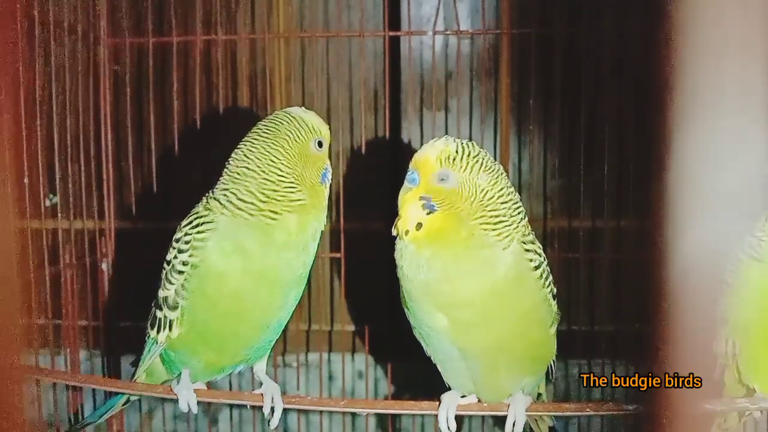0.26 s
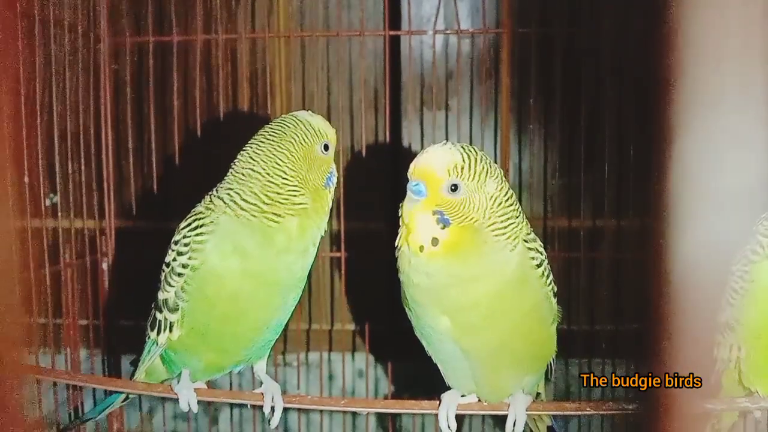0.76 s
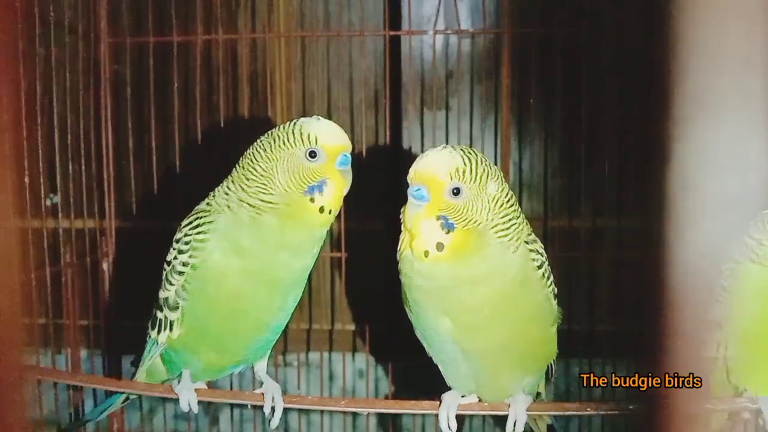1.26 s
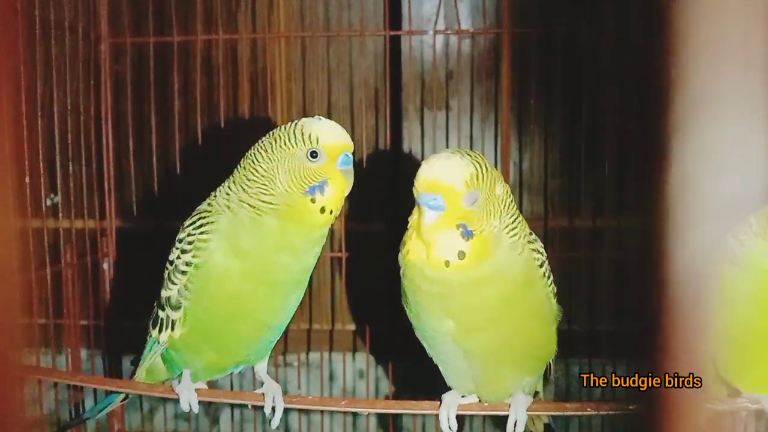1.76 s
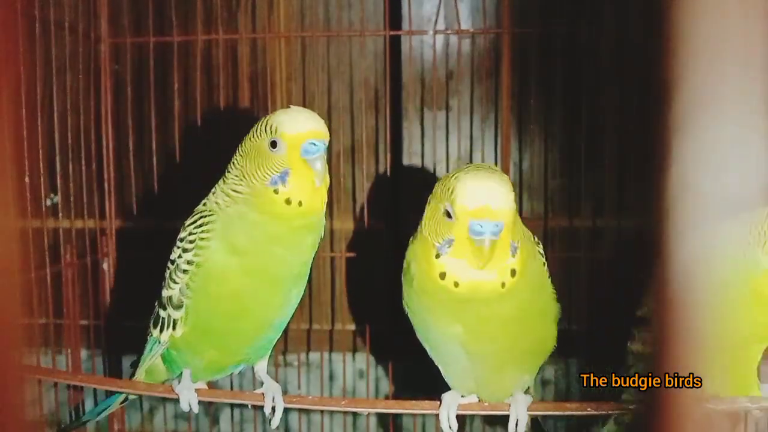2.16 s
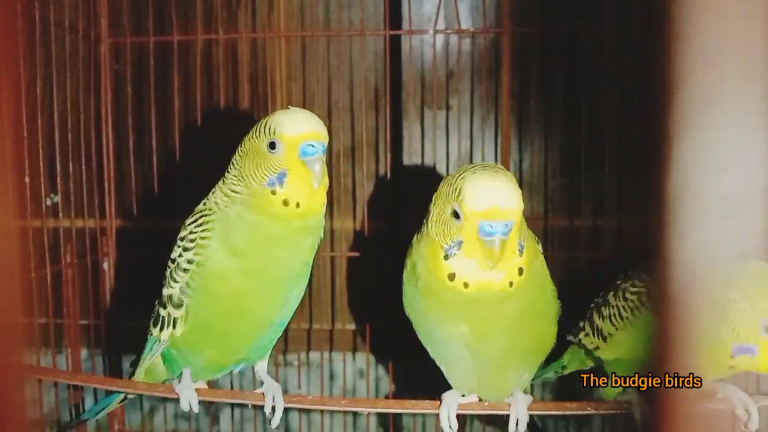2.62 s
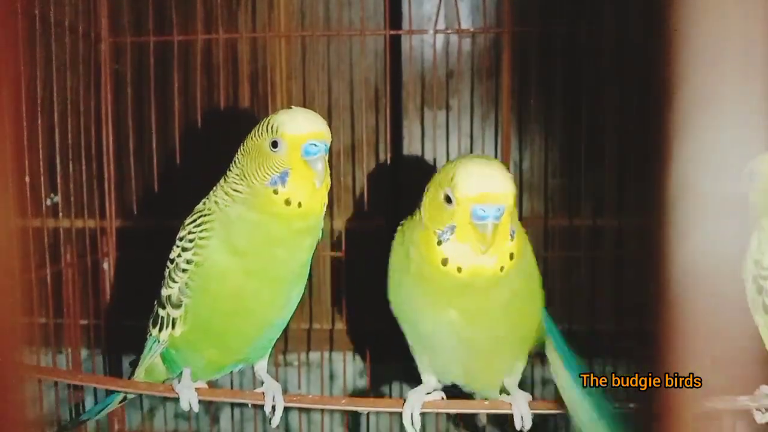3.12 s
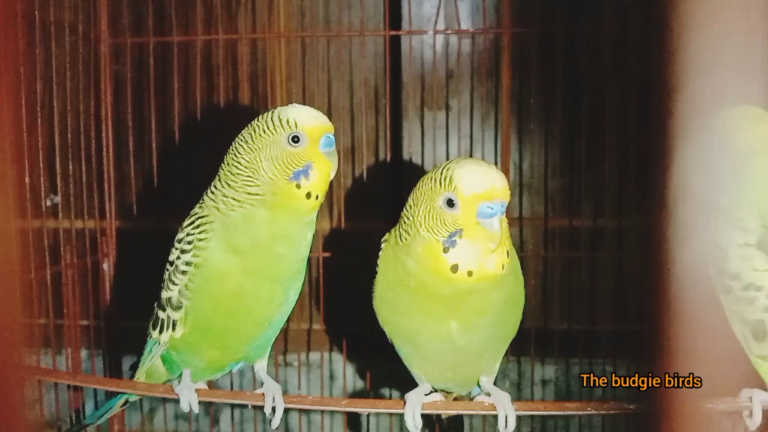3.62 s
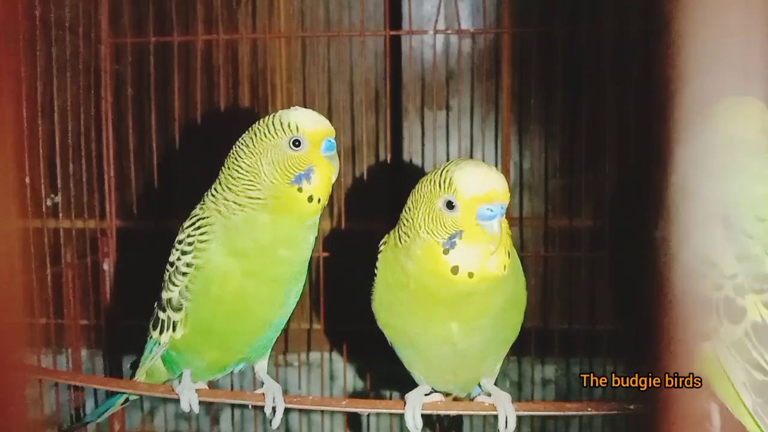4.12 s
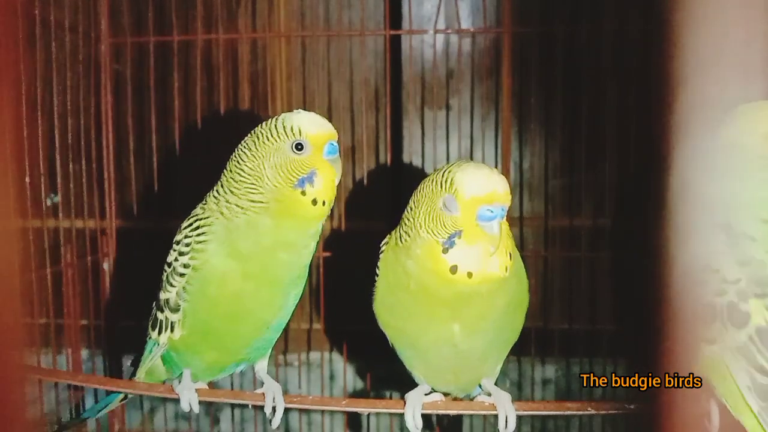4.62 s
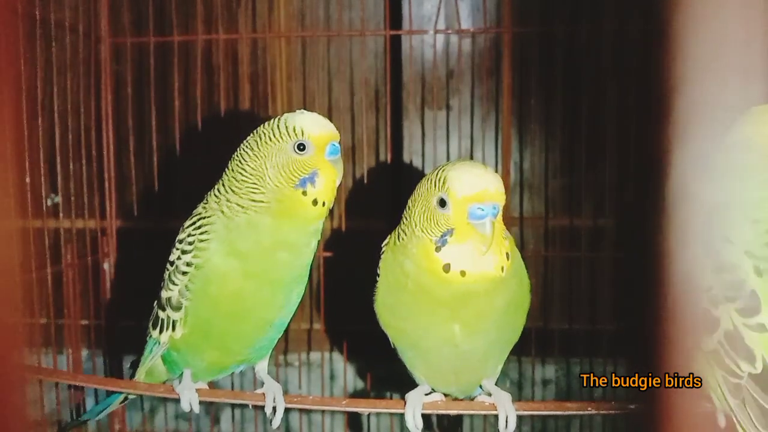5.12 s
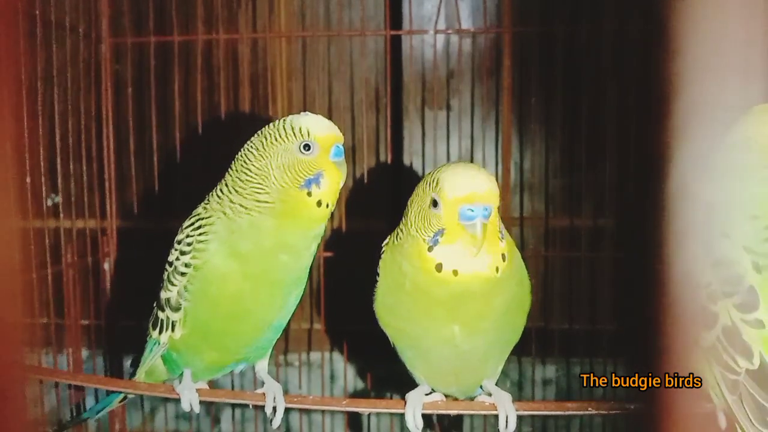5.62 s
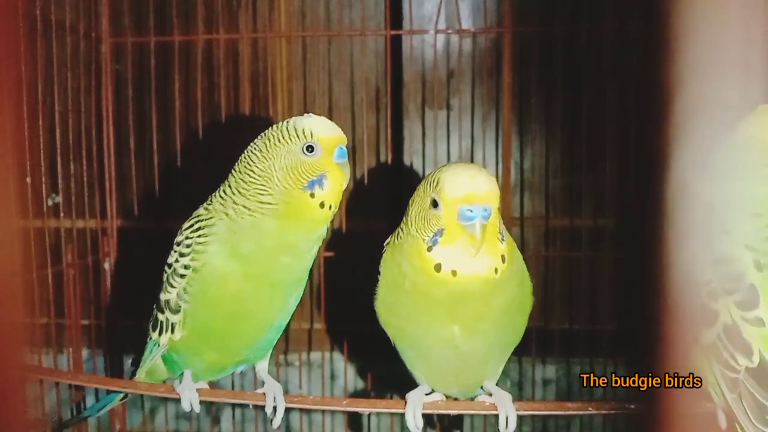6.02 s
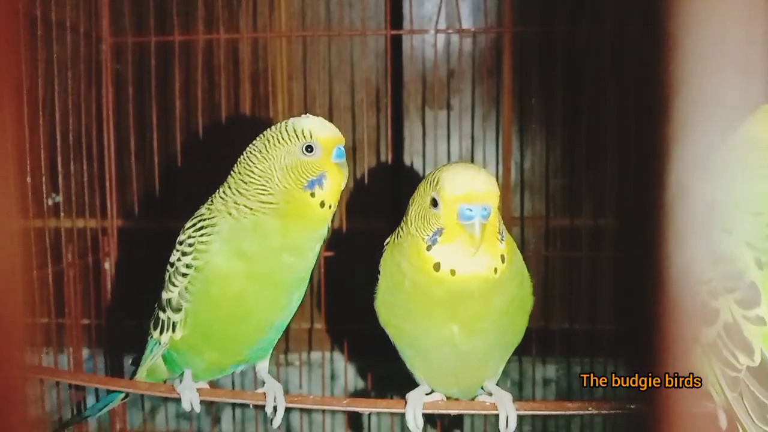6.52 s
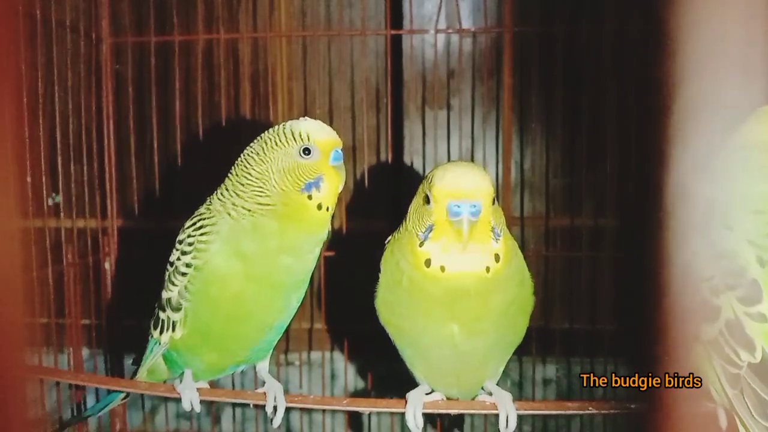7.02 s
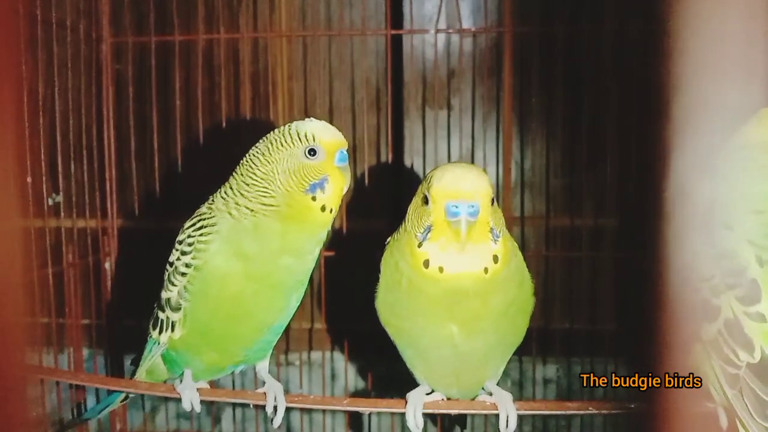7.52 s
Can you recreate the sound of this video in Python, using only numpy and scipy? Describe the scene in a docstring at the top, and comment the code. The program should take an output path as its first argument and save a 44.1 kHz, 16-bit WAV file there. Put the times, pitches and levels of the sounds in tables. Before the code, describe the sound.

Small parakeets warble at close range, with short room echoes. Sparse soft murmurs and grating rasps lead to a dense, piercing run of tiny arched chirps around two seconds in, more chirps near three, and two fluttering squawks before five. The rest is much softer: low gliding mutters, little clucks and dry rasps, over near-silent air with occasional beak clicks and dull perch bumps.

```python
"""Budgerigars warble in a cage close to the microphone: quick arched chirps from taut, buzzing membranes.
Gliding notes, soft low mutters and some louder, higher ones, slide onto a pitch; squawks swing up and down,
and rasps and clucks are slaps of the syrinx. Thin sine glides are faint calls and one clearer rising note.
Snaps of bright noise are beaks and claws, low noise bumps are birds shifting on the perch.
A small quiet room adds echoes, faint air and swells of low rumble; a noise suppressor thins the weak treble."""
import sys
import numpy as np
from scipy import signal
from scipy.fft import rfft, irfft
from scipy.io import wavfile
from scipy.ndimage import uniform_filter1d, minimum_filter1d

SR = 44100
rng = np.random.default_rng(int(sys.argv[2]) if len(sys.argv) > 2 else 0)


def generate_wav(sig):
    """Save sig (samples, or channels by samples) to the path in sys.argv[1] as 16-bit PCM at SR."""
    pcm = np.round(np.clip(np.atleast_2d(sig).T, -1, 1) * 32767).astype(np.int16)
    wavfile.write(sys.argv[1], SR, pcm)


N = 342657
EDGE_HZ = 15700  # upper band limit

# Levels of the calls and ticks are those ahead of the mix.
# Arched chirps. Each row: start in seconds, end in seconds, top pitch in Hz, place of the crest (0-1),
# level in dB, swell over its length in dB, beak opening in dB.
CHIRPS = [(1.404, 1.424, 3190, 0.73, -15, 4.5, -0.5), (1.461, 1.479, 2743, 0.6, -8.5, 3, 5.5),
          (1.528, 1.546, 3040, 0.6, -6, 5, 6), (1.605, 1.627, 3087, .62, -6.5, -1, 5.5),
          (1.673, 1.691, 2820, 0.78, -7, -9.5, 10.5), (1.678, 1.7, 3123, 0.49, -11, -3.5, 11.5),
          (1.743, 1.759, 2910, 0.69, -4.5, -6, 12), (1.749, 1.771, 3636, .6, -11, 13, -27.5),
          (1.815, 1.844, 3207, 0.62, -9.5, -9, 9), (1.88, 1.891, 3087, 0.64, 0, 4.5, 24),
          (1.883, 1.91, 3660, .56, -6.5, -2, -32.5), (1.924, 1.959, 3516, .47, -5, -3.5, 20.5),
          (1.992, 2.009, 2934, .62, -9, -5, 11), (2.007, 2.021, 2604, .46, -2.5, 0, 20.5),
          (2.014, 2.036, 3460, 0.51, -7.5, 2, 20.5), (2.075, 2.1, 3190, 0.71, -11.5, -16.5, 10),
          (2.098, 2.114, 3490, 0.55, -1.5, -0.5, 19), (2.195, 2.22, 2932, .54, -3, -17.5, 12.5),
          (2.284, 2.298, 2795, 0.3, -1, 5.5, 11.5), (2.295, 2.304, 3360, 0.57, -5.5, -5.5, 6),
          (2.797, 2.817, 3130, .66, -6, -24, 6), (2.866, 2.873, 2868, 0.68, 5, 1, 8.5),
          (2.925, 2.949, 3460, 0.75, -7, -12.5, -5), (3.02, 3.049, 3232, 0.51, -4, -44, 7),
          (3.099, 3.122, 3027, .58, -8, -6, 7), (3.243, 3.263, 1767, 0.74, -25.5, 4, -4.5),
          (3.325, 3.348, 1434, .62, -21, -32, -15), (3.402, 3.415, 2155, 0.99, -26.5, -15, -6),
          (3.505, 3.55, 2943, 0.23, -14.5, 3, 3.5), (3.624, 3.64, 3160, 0.24, -13, -18, 10.5)]
# Gliding notes: soft low mutters and some louder, higher, flatter chirps that slide onto a pitch.
# Each row: start in seconds, end in seconds, first pitch in Hz, settled pitch in Hz,
# roughness (0-1, held to 0.42 in the syrinx), level in dB, beak opening in dB.
GLIDING_NOTES = [(0.397, 0.468, 1196, 935, 0.14, -38.5, -22), (0.583, 0.656, 760, 941, 0.23, -42.5, -22),
                 (0.661, 0.708, 1594, 1185, 0.3, -37.5, -32), (1.329, 1.396, 1904, 1602, 0.15, -44, -31.5),
                 (1.908, 1.948, 2690, 2570, .35, -18.5, 14), (2.093, 2.102, 1710, 1806, .4, -12.5, 16.5),
                 (2.243, 2.269, 2094, 2080, .22, -19, 6.5), (3.492, 3.521, 2030, 2596, 0.13, -19.5, 10),
                 (3.619, 3.625, 2930, 1727, 0.08, -12, 5), (5.247, 5.29, 800, 1129, 0.13, -35, -34),
                 (5.357, 5.395, 989, 1317, 0.5, -37.5, -24), (5.432, 5.459, 1990, 1626, 0.2, -45, -22),
                 (5.45, 5.466, 1700, 3100, 0.05, -40, -26), (5.459, 5.507, 966, 1239, 0.57, -41.5, -29),
                 (5.546, 5.564, 1586, 1000, .16, -32, -18.5), (5.637, 5.66, 1328, 1034, 0.54, -27, -9),
                 (5.731, 5.747, 1490, 1090, 0.17, -32, -12.5), (5.752, 5.786, 875, 868, 0.5, -38, -18),
                 (5.837, 5.864, 1396, 1025, 0.16, -25, -15), (5.87, 5.911, 853, 1017, 0.29, -29, -20),
                 (6.587, 6.622, 835, 907, 0.28, -34, -7), (6.619, 6.636, 1203, 937, 0.36, -34, -8),
                 (6.945, 7.004, 1158, 1051, 0.07, -28.5, -16.5), (7.097, 7.125, 1294, 1680, 0.08, -29, -16),
                 (7.114, 7.142, 1480, 1207, 0.22, -30, -5), (7.174, 7.238, 1220, 1490, 0.14, -26.5, -20),
                 (7.231, 7.29, 1536, 1434, 0.21, -25, -23), (7.316, 7.339, 1017, 1211, 0.32, -26.5, -19.5),
                 (7.346, 7.387, 1618, 1340, 0.1, -37, -30)]
# Two long warbled squawks, each a curve. Each row: time in seconds, pitch in Hz, level in dB.
SQUAWKS = [
    [(4.606, 2850, -39.5), (4.63, 3290, -16.5), (4.66, 2754, -30.5), (4.69, 2032, -24.5),
     (4.71, 3300, -18.5), (4.724, 2657, -16.5), (4.74, 2405, -18.5), (4.751, 3160, -17),
     (4.76, 1857, -24.5), (4.78, 1080, -38.5)],
    [(4.855, 2590, -31.5), (4.862, 3374, -14), (4.867, 2350, -16), (4.899, 2950, -22.5), (4.908, 1680, -28),
     (4.924, 3162, -17), (4.955, 3047, -8), (4.962, 2180, -24), (4.985, 2218, -14.5), (5.003, 2610, -23),
     (5.011, 1423, -20), (5.03, 1117, -32)],
]
# Buzzy rasps. Each row: start in seconds, end in seconds, level in dB, swell over its length in dB,
# low shelf of the throat in dB.
RASPS = [(0.0, 0.031, -0.5, -3, -20.5), (0.695, 0.723, -44, 3, 7), (.722, 0.768, -30.5, 7, -1),
         (0.751, 0.794, -20.5, 0, 1.5), (0.911, 0.963, -46.5, 8, 1.5), (0.966, 1.002, -34.5, -5.5, -4),
         (1.002, 1.045, -25, -1.5, 0), (2.327, 2.349, -19.5, -9, -1.5), (2.354, 2.366, -3.5, 39, -9.5),
         (2.372, 2.403, -25, -8, 1), (2.524, 2.572, -26.5, -12, -3), (2.573, 2.593, -14.5, 19, -3),
         (2.589, 2.622, -20, -7.5, 1.5), (2.744, 2.795, -21, -9.5, 7), (2.825, 2.852, -12.5, 3, -57),
         (5.795, 5.84, -43, 5, 5), (6.033, 6.081, -40, -18, 8), (6.074, 6.112, -28.5, -1, -3),
         (6.114, 6.142, -18, 9.5, -1), (6.727, 6.746, -33, 5, 7.5), (7.165, 7.181, -28.5, -6, 9.5),
         (7.551, 7.585, -24, -15, 4.5)]
# Clucks, each a very short rasp. Each row: time in seconds, level in dB.
CLUCKS = [(3.513, -38), (5.419, -40), (5.536, -52), (5.627, -41), (6.018, -37.5), (6.412, -39),
          (6.453, -42), (6.469, -41), (6.783, -23.5), (6.795, -30.5), (7.152, -31.5), (7.297, -28.5)]
# Thin glides: faint calls, some perhaps farther off, and one clearer rising note. Each row: start in seconds,
# end in seconds, first pitch in Hz, last pitch in Hz, level in dB.
THIN_GLIDES = [(1.406, 1.46, 1415, 1700, -56), (1.501, 1.576, 1645, 1320, -43),
               (1.545, 1.676, 1490, 1540, -42), (1.682, 1.739, 1370, 1180, -49),
               (1.771, 1.86, 1780, 1900, -60), (3.141, 3.198, 1377, 1850, -36.5),
               (4.235, 4.313, 1840, 1900, -75.5), (4.291, 4.394, 1670, 1600, -72),
               (4.311, 4.388, 860, 790, -74), (5.175, 5.195, 5910, 5900, -54.5)]
# Colour of throat and beak, with a main resonance near 3 kHz. Each row: frequency in Hz, gain in dB.
THROAT = [(300, -30.5), (550, -29.5), (900, -12), (1150, -8.5), (1600, -11), (2300, -10), (3100, 3.5),
          (3600, -3), (4150, -5.5), (5400, 4.5), (7600, -9.5), (11000, -31.5), (14000, -30.5)]
# How much of the beak's opening each frequency takes up. Each row: frequency in Hz, share.
BEAK_SHARE = [(3700, 0.026), (4300, 0.46), (5600, 0.98), (6850, 0.86), (7400, 0.49), (9000, 0.52),
              (12000, 0.7), (15000, 0.45)]
# How each kind of call tints the throat's colour. Each row: frequency in Hz, gain in dB.
CHIRP_TINT = [(700, -1.5), (1400, 3), (2200, 1), (3100, 0.5), (4200, -2.5), (5600, -1), (8000, -2),
              (14000, -4.5)]
GLIDING_TINT = [(800, 2), (1300, -3.5), (2400, 4.5), (3100, -0.5), (3900, -4.5), (5500, -3), (8000, 0),
                (13000, 2)]
SQUAWK_TINT = [(1200, -2), (2300, 4.5), (3100, -1.5), (4100, -7), (5500, -3), (7500, 2.5), (13000, -1.5)]
RASP_TINT = [(600, -2), (1100, -4.5), (2100, -2), (3100, -1), (4200, 1.5), (5500, 2), (8000, 1.5),
             (13000, 1.5)]
# The highest treble of the calls is stronger or weaker over time. Each row: time in seconds, treble gain in dB.
TOP_TREBLE = [(0, -1), (.75, -4), (1.7, 6.5), (2, 13.5), (2.599, 0.5), (3.1, 4), (3.55, 19), (4.699, 6),
              (7.2, -9), (7.599, 8)]
# Ticks of beaks and claws. Each row: time in seconds, level in dB.
TICKS = [(0.5617, -44), (1.1214, -38), (3.471, -48), (3.77, -41), (3.92, -45.5), (4.0106, -43.5),
         (4.2592, -42), (4.599, -40), (5.1782, -53)]
# Colour of a tick. Each row: frequency in Hz, relative level in dB.
TICK_COLOUR = [(1000, -31), (3500, -23), (6000, -17), (8000, -13), (11000, -19), (14500, -8),
               (16000, -22.5)]
# Soft bumps of birds shifting on the perch. Each row: start in seconds, length in seconds, level in dB.
BUMPS = [(0.69, 0.43, -65.5), (2.07, 0.076, -62.5), (4.677, 0.53, -61.5), (6.706, 0.13, -51),
         (6.775, 0.13, -58.5)]
# Colour of a bump. Each row: frequency in Hz, relative level in dB.
BUMP_COLOUR = [(60, -31), (150, 8), (250, 5), (400, -6), (800, -26), (3000, -76.5)]
# Reverberation time of the room. Each row: frequency in Hz, time to fall by 60 dB in seconds.
ROOM_T60 = [(700, 0.18), (1800, 0.23), (3200, 0.27), (5500, 0.31), (9000, 0.36), (14000, 0.21)]
# Strength of the reverberation. Each row: frequency in Hz, level in dB.
ROOM_DB = [(700, -6.5), (1500, -6), (3200, -14.5), (5500, -18), (9000, -20), (14000, -10)]
# Colour of the quiet air in the room. Each row: frequency in Hz, relative level in dB per Hz.
AIR = [(18, -37), (30, -18.5), (118, 1), (394, -12), (1350, -8), (2120, -17), (3310, -23), (4080, -46.5),
       (5590, -24.5), (7270, -35.5), (7870, -22), (9220, -35), (16000, -44)]
# Swells of low rumble. Each row: start in seconds, end in seconds, centre in Hz, level in dB ahead of the bass cut.
RUMBLES = [(0, 0.346, 65.6, -60.5), (0.521, 1.144, 156.3, -53.5), (0.549, 1.213, 77, -63),
           (1.364, 1.706, 86, -64), (2.345, 3.53, 65, -59), (2.9, 3.75, 133.2, -69),
           (3.562, 3.756, 84.7, -61), (4.15, 4.418, 140, -66.5), (4.547, 5.549, 158, -57),
           (4.901, 5.56, 83.4, -55), (5.983, 6.252, 121, -66), (6.683, 6.9, 80, -72.5)]

# Chirps: depth of the pitch arch, roughness that stays, extra roughness at the onset and its decay time
CHIRP_BOW, STEADY_ROUGH, ONSET_ROUGH, CLEAR_S = 1.35, .17, .42, 0.0046
# Gliding notes: time constant of the slide as a share of the length; the end sags more the farther the pitch rose
SETTLE_SHARE, END_SAG, SAG_PER_OCTAVE_RISEN = .26, .12, 0.23
# the lower a gliding note is, the fuller the throat
FULL_DB_AT_1_KHZ, FULL_DB_PER_OCTAVE = 10, -11
# roughness of each squawk (0-1)
SQUAWK_ROUGH = [.1, .2]
# Rasps: a harder push slaps faster and opens the beak wider; doubling is the dB that doubles the rate
MIDDLE_PUSH_DB, SLAPS_PER_S, DOUBLING_DB, FASTEST_SLAPS_PER_S = -22, 270, 15, 340
RASP_BEAK_DB, BEAK_DB_PER_DB = -10, 0.71
CLUCK_S, CLUCK_SWELL_DB, CLUCK_LOW_DB = .0045, -8.5, 4
# A chirp with a late crest is set off by a low croak; its level is relative to the chirp's
RISING_CREST, CROAK_LEAD_S, CROAK_S = .58, 0.0027, .01
CROAK_DB, CROAK_SWELL_DB, CROAK_LOW_DB = -20, 11, 2.5


def gain_of(db):
    """Decibels to amplitude."""
    return 10 ** (np.asarray(db) / 20)


def evened(x):
    """Scales to an rms of 1."""
    return x / np.sqrt(np.mean(x ** 2) + 1e-20)


def read(points, hz):
    """Reads a table on a log-frequency axis."""
    f, value = np.transpose(points)
    return np.interp(np.log(hz + 1), np.log(f + 1), value)


def add(mix, s, sound):
    """Mixes a sound in at time s."""
    part = mix[max(round(s * SR), 0):][:len(sound)]
    part += sound[:len(part)]


def coloured(x, points):
    """Filters x by a spectrum of (Hz, dB) points, to an rms of 1."""
    hz = np.fft.rfftfreq(len(x), 1 / SR)
    return evened(irfft(rfft(x) * gain_of(read(points, hz)), len(x)))


def wander(hz, count=N):
    """Smooth random motion of rms 1, moving at up to about hz."""
    size = max(count, SR // 2)
    f = np.fft.rfftfreq(size, 1 / SR)
    noise = rfft(rng.standard_normal(size))
    return evened(irfft(noise * np.exp(-(f / hz) ** 2), size))[:count]


def span(start, end):
    """The samples between two times."""
    return slice(max(round(start * SR), 0), round(end * SR))


def progress(start, end):
    """Runs from 0 to 1 over the samples between two times."""
    return np.linspace(0, 1, round((end - start) * SR))


def harmonics(phase, hz, slope_db=0, uneven_db=0, count=15):
    """A stack of harmonics under the band limit, uneven by chance, phased to buzz without clicking."""
    height = gain_of(slope_db * np.arange(count) + uneven_db * rng.standard_normal(count))
    stack = 0
    for k in range(1, count + 1):
        # the quadratic phase spreads the energy over the cycle
        partial = np.cos(k * phase + np.pi * k * k / (count // 2))
        stack = stack + height[k - 1] * partial * (k * hz < EDGE_HZ)
    return evened(stack)


def syrinx(hz, rough, jitter, flutter, hiss, slope_db, uneven_db, waver_share, waver_hz, doubling=0.28):
    """Membranes buzz along a pitch curve; roughness shakes them, weights alternate cycles and adds hiss."""
    count, rough = len(hz), np.clip(rough, 0, .42)
    waver = 1 + waver_share * wander(waver_hz, count) + jitter * rough * wander(410, count)
    phase = 2 * np.pi * np.cumsum(hz * waver) / SR
    unsteady = 1 + rough * (flutter * wander(700, count) + doubling * np.cos(phase / 2))
    buzz = (1 - rough) * harmonics(phase, hz, slope_db, uneven_db) * unsteady
    return buzz + hiss * rough * rng.standard_normal(count)


def voiced(source, level_db, swell_db, low_db, beak_db, edge_share, low_hz=1900):
    """Shapes one syllable: air pressure swells or fades, the throat sets the low end, the beak the top."""
    count = len(source)
    pressure = signal.windows.tukey(count, min(edge_share, 1)) * gain_of(swell_db * np.linspace(0, 1, count))
    hz = np.fft.rfftfreq(count, 1 / SR)
    low_shelf_db = low_db / (1 + (hz / low_hz) ** 8)
    colour_db = read(THROAT, hz) + low_shelf_db + beak_db * read(BEAK_SHARE, hz)
    throat_sound = irfft(rfft(source) * gain_of(colour_db), count)
    return gain_of(level_db) * evened(pressure * throat_sound)


def chirps(lift=0.81, low_db=5, edge_share=.58):
    """Pitch and force bow over one crest of membrane tension; the onset is hoarse and clears in time."""
    out = np.zeros(N)
    for start, end, top_hz, crest, level_db, swell_db, beak_db in CHIRPS:
        u = progress(start, end)
        tension = np.exp(-CHIRP_BOW * (u - crest) ** 2)
        rough = STEADY_ROUGH + ONSET_ROUGH * np.exp(-u * (end - start) / CLEAR_S)
        source = syrinx(top_hz * tension, rough, jitter=.12, flutter=1.0, hiss=0.22,
                        slope_db=0.72, uneven_db=1.1, waver_share=0.01, waver_hz=220)
        tinted = coloured(source * tension ** lift, CHIRP_TINT)
        add(out, start, voiced(tinted, level_db, swell_db, low_db, beak_db, edge_share))
    return out


def gliding_notes(swell_db=-3, edge_share=0.39):
    """Low mutters and some louder, higher notes move exponentially onto a pitch and mostly sag at the end."""
    out = np.zeros(N)
    for start, end, first_hz, settled_hz, rough, level_db, beak_db in GLIDING_NOTES:
        u = progress(start, end)
        sag = END_SAG + SAG_PER_OCTAVE_RISEN * np.log2(settled_hz / first_hz)
        slide_hz = settled_hz + (first_hz - settled_hz) * np.exp(-u / SETTLE_SHARE)
        hz = slide_hz * (1 - sag * u ** 4)
        low_db = FULL_DB_AT_1_KHZ + FULL_DB_PER_OCTAVE * np.log2(settled_hz / 1000)
        source = syrinx(hz, rough, jitter=.11, flutter=0.72, hiss=.7,
                        slope_db=-0.48, uneven_db=0.67, waver_share=0.02, waver_hz=110)
        tinted = coloured(source, GLIDING_TINT)
        add(out, start, voiced(tinted, level_db, swell_db, low_db, beak_db, edge_share))
    return out


def squawks(low_db=4, beak_db=-14, edge_share=0.029):
    """Long notes through a half-shut beak, swinging up and down in pitch and level."""
    out = np.zeros(N)
    for curve, rough in zip(SQUAWKS, SQUAWK_ROUGH):
        s, hz, level_db = np.transpose(curve)
        t = np.arange(s[0], s[-1], 1 / SR)
        source = syrinx(np.interp(t, s, hz), rough, jitter=0.129, flutter=1.87, hiss=.4,
                        slope_db=-1.22, uneven_db=3.9, waver_share=.013, waver_hz=220)
        tone = voiced(coloured(source, SQUAWK_TINT), 0, 0, low_db, beak_db, edge_share)
        # level the tone over 10 ms so that the curve sets its loudness
        loudness = np.sqrt(uniform_filter1d(tone ** 2, size=441) + 1e-3)
        add(out, s[0], tone / loudness * gain_of(np.interp(t, s, level_db)))
    return out


def rasp(start, end, level_db, swell_db, low_db, unevenness=.38, scatter=.14,
         tight_hz=2850, loose_hz=1080, edge_share=0.19):
    """The syrinx slaps open at an uneven slow rate, letting out a squeak of wandering pitch and a puff."""
    count = len(progress(start, end))
    push_db = level_db - MIDDLE_PUSH_DB
    rate = min(SLAPS_PER_S * 2 ** (push_db / DOUBLING_DB), FASTEST_SLAPS_PER_S)
    force = gain_of(1.8 * wander(200, count))
    # a full, loose throat squeaks low
    middle_hz = np.interp(low_db, [-4, 4], [tight_hz, loose_hz])
    hz = middle_hz * np.exp(scatter * wander(450, count))
    squeak = harmonics(2 * np.pi * np.cumsum(hz) / SR, hz)
    uneven_rate = rate * np.exp(unevenness * wander(280, count))
    since_slap = (np.cumsum(uneven_rate) / SR % 1) / rate
    # a burst about 1.2 ms into each cycle, over a steady leak
    slap = .25 + np.exp(-(since_slap / .0012 - 1) ** 2)
    puffs = (squeak + .5 * rng.standard_normal(count)) * slap * force
    beak_db = RASP_BEAK_DB + BEAK_DB_PER_DB * push_db
    return voiced(coloured(puffs, RASP_TINT), level_db, swell_db, low_db, beak_db, edge_share)


def rasps():
    """Slaps of the syrinx as rasps, short clucks, and the croak that sets off each rising chirp."""
    out = np.zeros(N)
    for row in RASPS:
        add(out, row[0], rasp(*row))
    for s, level_db in CLUCKS:
        add(out, s, rasp(s, s + CLUCK_S, level_db, CLUCK_SWELL_DB, CLUCK_LOW_DB))
    for start, _, _, crest, level_db, _, _ in CHIRPS:
        if crest > RISING_CREST:
            s = start - CROAK_LEAD_S
            add(out, s, rasp(s, s + CROAK_S, level_db + CROAK_DB, CROAK_SWELL_DB, CROAK_LOW_DB))
    return out


def top_treble_varied(x, above_hz=10000):
    """The highest treble of the calls is stronger or weaker over time, by a curve."""
    hz = np.fft.rfftfreq(N, 1 / SR)
    top = irfft(rfft(x) * (1 - 1 / (1 + (hz / above_hz) ** 12)), N)
    treble_db = np.interp(np.arange(N) / SR, *np.transpose(TOP_TREBLE))
    return x + top * (gain_of(treble_db) - 1)


def bounced(x, delay_s=.00153, strength=.38):
    """One close reflection combs the sound."""
    t = np.arange(N) / SR
    return x + strength * np.interp(t - delay_s, t, x, left=0)


def thin_glides(waver=.02, overtone_db=-12):
    """Nearly pure, slightly wavering glides: a sine and one weak overtone."""
    out, shake = np.zeros(N), wander(120)
    for start, end, first_hz, last_hz, level_db in THIN_GLIDES:
        wobble = 1 + waver * shake[span(start, end)]
        glide_hz = np.linspace(first_hz, last_hz, len(wobble))
        phase = 2 * np.pi * np.cumsum(glide_hz * wobble) / SR
        tone = evened(np.sin(phase) + gain_of(overtone_db) * np.sin(2 * phase))
        add(out, start, gain_of(level_db) * tone * signal.windows.tukey(len(tone), .5))
    return out


def ticks(t60=0.038, trim_db=-7):
    """Beaks and claws: tiny snaps of bright noise that start at once and die exponentially."""
    strength, t = np.zeros(N), np.arange(SR // 10) / SR
    for s, level_db in TICKS:
        add(strength, s, gain_of(level_db + trim_db - 60 * t / t60))
    return strength * coloured(rng.standard_normal(N), TICK_COLOUR)


def bumps():
    """Birds shifting on the perch: dull, rounded swells of low noise."""
    strength = np.zeros(N)
    for s, length, level_db in BUMPS:
        add(strength, s, gain_of(level_db) * np.hanning(round(length * SR)))
    return strength * coloured(rng.standard_normal(N), BUMP_COLOUR)


def room(x, near_db=-12, near_t60=0.063, first_s=.002, build_s=0.036):
    """Quick reflections from the cage and the wall behind, then a tail that builds and dies band by band."""
    t = np.arange(SR) / SR
    # about 3000 random echoes a second, of either sign
    signs = rng.choice([-1., 1.], (2, SR))
    sparse = signs * (rng.random((2, SR)) < 3000 / SR) * (t > first_s)
    near = sparse[0] * gain_of(-60 * t / near_t60)
    hz, age, z = signal.stft(sparse[1] * (1 - np.exp(-t / build_s)), SR, nperseg=256)
    z = z * gain_of(-60 * age / read(ROOM_T60, hz)[:, None])
    energy_norm = np.linalg.norm(signal.istft(z, SR, nperseg=256)[1])
    z *= (gain_of(read(ROOM_DB, hz)) / energy_norm)[:, None]
    tail = signal.istft(z, SR, nperseg=256)[1][:SR]
    response = tail + gain_of(near_db) * near / np.linalg.norm(near)
    return signal.fftconvolve(x, response)[:N]


def background(air_db=-71, width_hz=15):
    """Faint air of gently varying level, and swells of narrow low rumble."""
    swell = gain_of(1.8 * wander(7))
    out = gain_of(air_db) * swell * coloured(rng.standard_normal(N), AIR)
    f = np.fft.rfftfreq(2 * SR, 1 / SR)
    for start, end, hz, level_db in RUMBLES:
        count = len(progress(start, end))
        noise = rfft(rng.standard_normal(2 * SR))
        boom = irfft(noise / (1 + ((f - hz) / width_hz) ** 2))[:count]
        add(out, start, gain_of(level_db) * evened(boom * signal.windows.tukey(count, .4)))
    # the small microphone loses the deepest bass
    return signal.sosfilt(signal.butter(2, 42, "high", fs=SR, output="sos"), out)


def limited(x, ceiling=0.88):
    """A fast limiter holds the loudest peaks under the ceiling with a smoothed gain."""
    gain = minimum_filter1d(np.minimum(1, ceiling / (abs(x) + 1e-9)), size=257)
    return x * uniform_filter1d(uniform_filter1d(gain, size=129), size=129)


def scene(chirps_db=-6.0, squawks_db=-3, gliding_db=-3.0, rasps_db=-2, thin_wet_db=3, gliding_wet_db=1):
    """Chirps, gliding notes, squawks, rasps, thin glides and ticks, their echo, bumps and background."""
    song = gain_of(chirps_db) * chirps() + gain_of(squawks_db) * squawks()
    calls = top_treble_varied(song + bounced(gain_of(rasps_db) * rasps())) + ticks()
    gliding = bounced(gain_of(gliding_db) * gliding_notes())
    thin = thin_glides()
    echo = room(calls + gain_of(gliding_wet_db) * gliding + gain_of(thin_wet_db) * thin)
    return (calls + gliding + thin + echo + bumps() + background())[None]


def record(dry, threshold_db=-84, depth_db=9, from_hz=1500):
    """A noise suppressor lowers weak sound, fully from from_hz up; then the limiter and the band limit."""
    hz, _, z = signal.stft(dry[0], SR, nperseg=512, noverlap=384)
    # power smoothed over neighbouring bands, then over time
    power = uniform_filter1d(uniform_filter1d(abs(z) ** 2, size=5, axis=0), size=5, axis=1)
    weak = 1 / (1 + abs(power) / gain_of(threshold_db) ** 2)
    z = z * gain_of(-depth_db * weak * np.minimum(hz / from_hz, 1)[:, None])
    cleaned = limited(signal.istft(z, SR, nperseg=512, noverlap=384)[1][:N])
    band_limit = signal.firwin(301, EDGE_HZ, window=("kaiser", 9), fs=SR)
    return signal.oaconvolve(cleaned, band_limit, "same")[None]


dry = scene()
out = record(dry)
generate_wav(out)
```